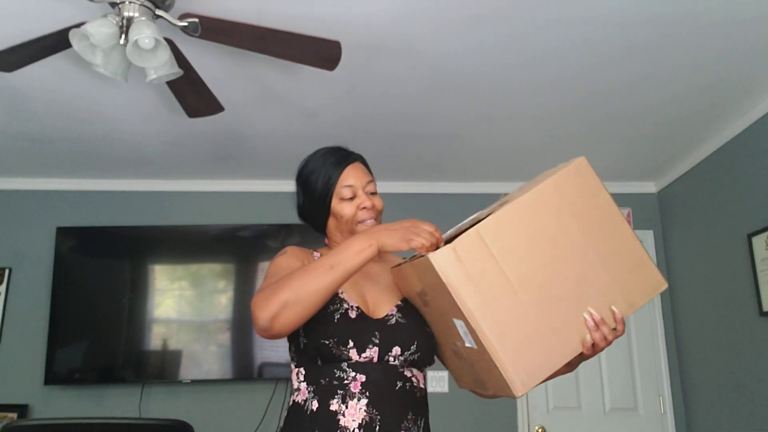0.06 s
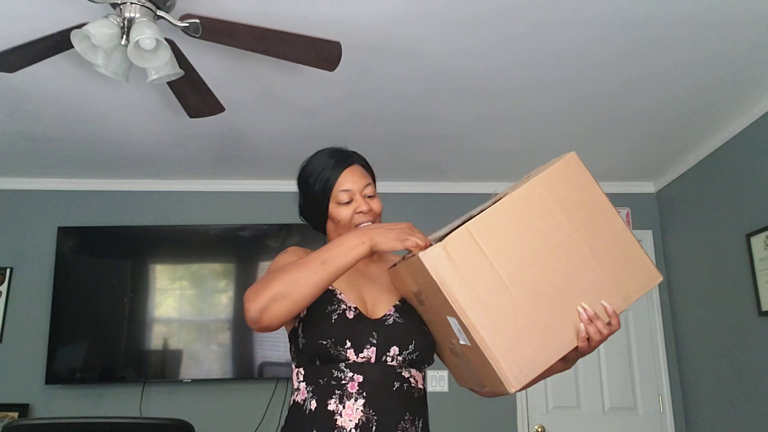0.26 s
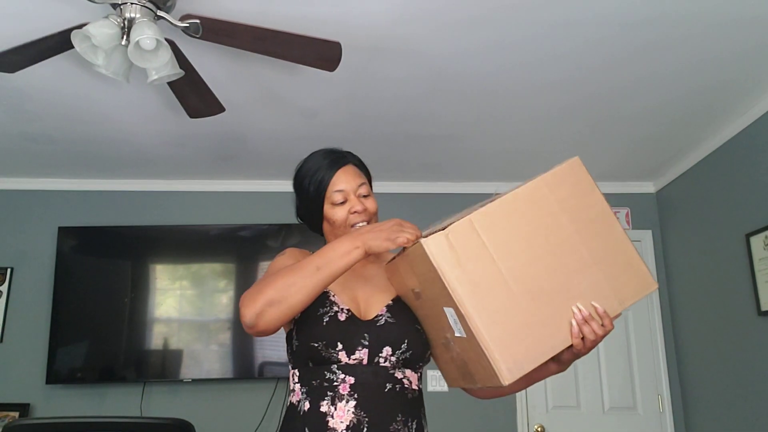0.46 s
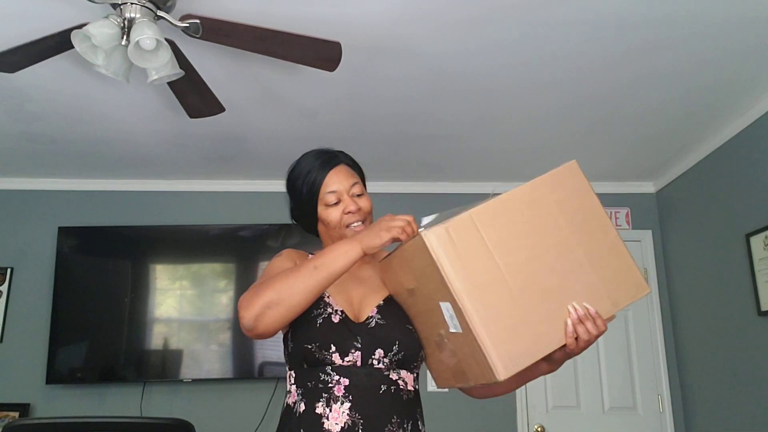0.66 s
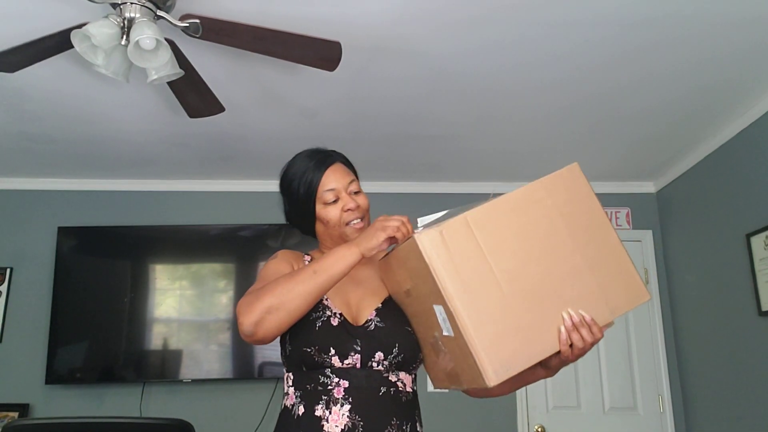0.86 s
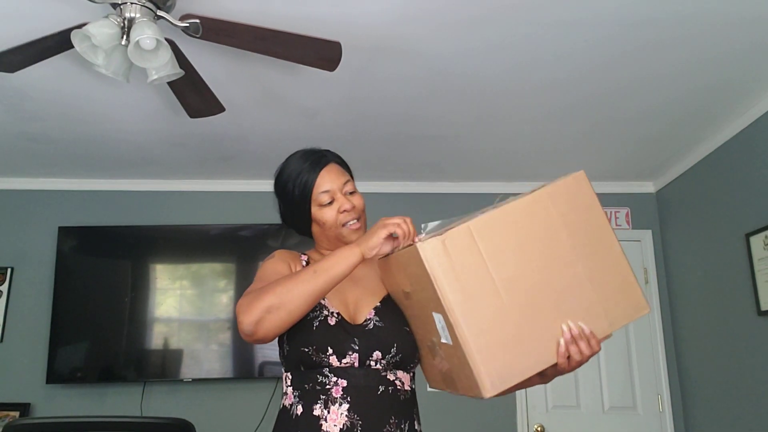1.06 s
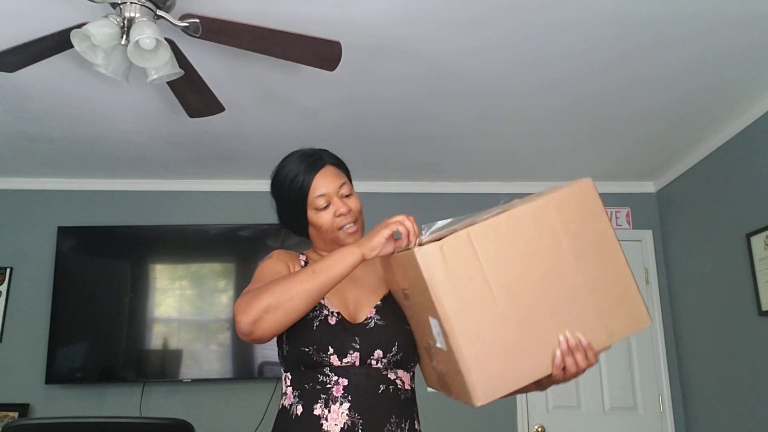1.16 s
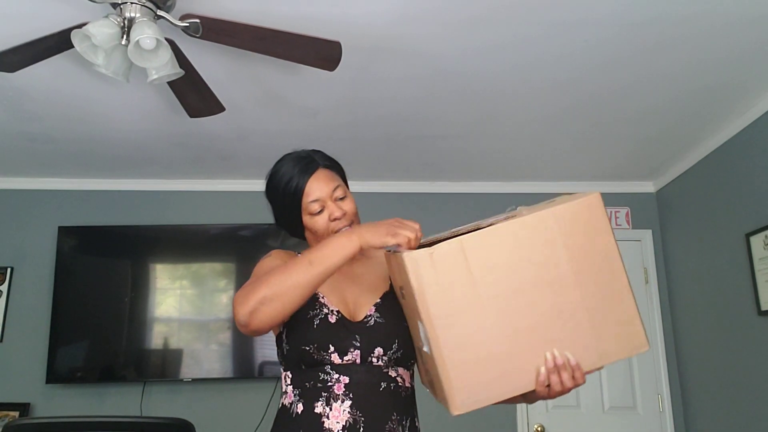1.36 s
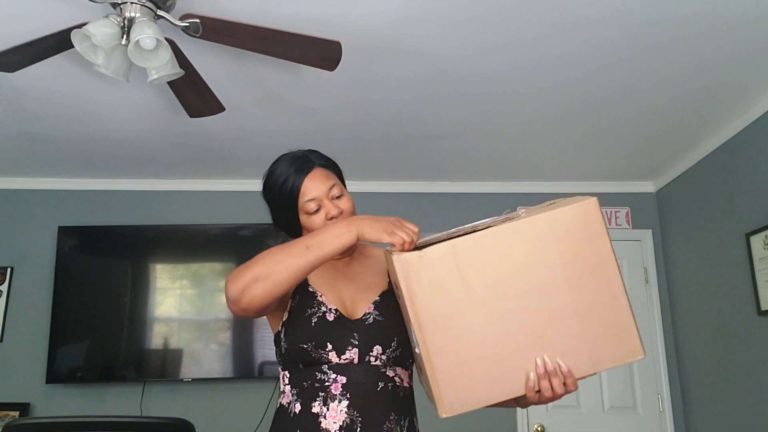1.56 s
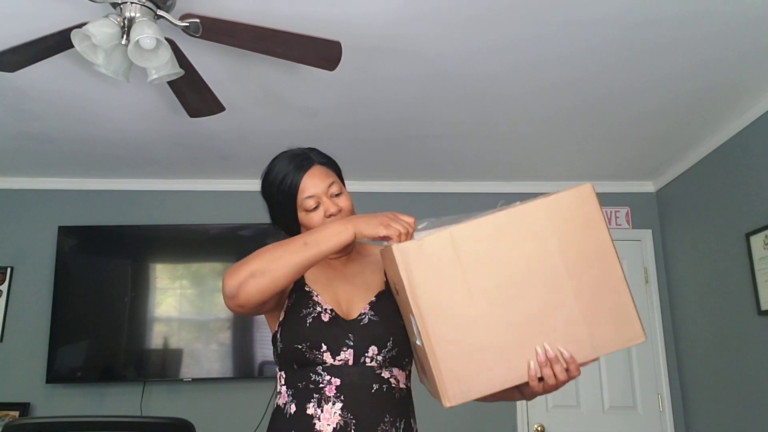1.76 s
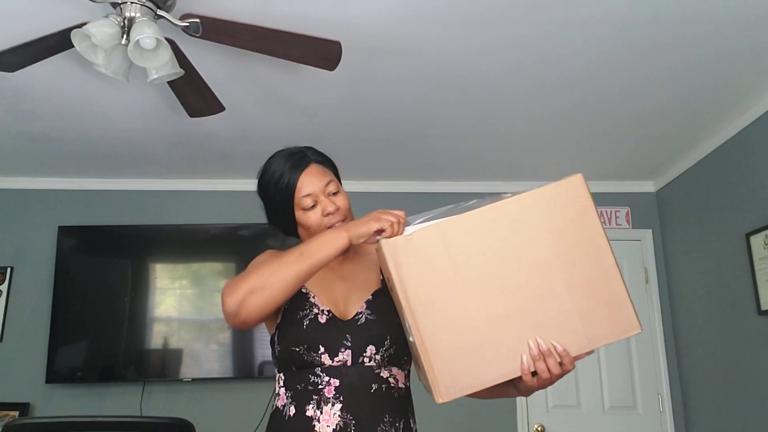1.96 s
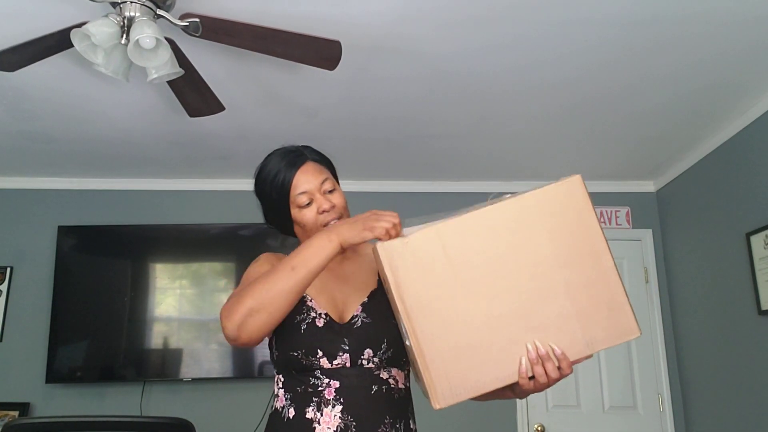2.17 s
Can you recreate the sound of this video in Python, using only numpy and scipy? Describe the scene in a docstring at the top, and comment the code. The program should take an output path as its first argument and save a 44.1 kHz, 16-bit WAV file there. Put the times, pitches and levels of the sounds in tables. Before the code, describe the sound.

Packing tape snaps and crackles under picking fingernails on a large cardboard box in a bare room

```python
"""Packing tape snaps and crackles under fingernails, on a large cardboard box held in the arms.
Each snap is a dying puff of noise, heard straight and off the ceiling; crackle and scrape are random grains.
The box answers with dull knocks and a rubbing rumble, made by ringing its modes.
A bare living room rings on with a wall echo and a noise tail, over a steady hush.
Two microphones listen from the left: the left one hears the sound slightly sooner."""
import sys
import numpy as np
from scipy import signal
from scipy.fft import rfft, irfft, next_fast_len
from scipy.io import wavfile

SR = 44100
rng = np.random.default_rng(int(sys.argv[2]) if len(sys.argv) > 2 else 0)


def boost_factor(decibels):
    """Convert a level in decibels to a linear amplitude factor."""
    exponent = np.asarray(decibels, float) / 20
    return 10 ** exponent


def pcm_store(signal):
    """Save signal as 16-bit PCM."""
    levels = np.round(np.clip(np.atleast_2d(signal), -1, 1) * 32767)
    wavfile.write(sys.argv[1], SR, levels.astype(np.int16).T)


N = 98298  # samples in the scene


def tape():
    """Snaps, with crackles and scrapes that follow the hands; row 0 goes to the microphones, row 1 to the room."""
    # tape snaps before the trims below: [t/s, treble level/dB, card level below the split/dB,
    # card level above it/dB, direct path against the ceiling echo/dB (the box often hides it)]
    snaps = [(.062, -58, -55.5, -73, -7), (0.155, -28, -71, -48, -6), (0.174, -48, -75, -65, 0),
             (0.216, -37, -71, -47.5, -6.5), (0.2744, -32.5, -69, -44.5, -17),
             (0.285, -28.5, -41, -44, -24), (0.4066, -30.5, -55.5, -56, -14), (0.5701, -23, -36, -56, -0.5),
             (0.677, -60, -48, -65, -2.5), (0.9016, -24, -40.5, -32.5, -9), (.941, -46, -61, -42.5, 1),
             (0.958, -45, -52, -56, 3.5), (1.1454, -33.5, -50.5, -60, 6), (1.163, -57, -47.5, -60, 2.5),
             (1.2027, -37.5, -65, -55.5, 8), (1.3316, -48, -86, -94, 3.5), (1.3713, -36, -83, -76, 6),
             (1.403, -52, -51, -47.5, 9.5), (1.4308, -29.5, -51, -40.5, -1.5),
             (1.529, -43.5, -72, -82, 6.5), (1.614, -36, -57, -42.5, 1), (1.674, -42, -74, -57, -2),
             (1.686, -29, -55, -43, 7), (1.740, -23, -37, -36, 3), (1.768, -16, -36, -32, 5),
             (1.767, -24.5, -28, -28.5, -1), (1.9926, -53, -55, -57.5, 1), (2.018, -45, -75, -70, 5),
             (2.063, -46.5, -82, -59.5, 4), (2.1137, -45, -77, -55, 4), (2.152, -40.5, -78, -60, 4),
             (2.1758, -31, -54, -75, 7)]
    # tape through the microphones, shape only: [f/Hz, level per Hz/dB]
    tape_colour = [(3000, -16.5), (5500, -20), (6500, -8), (7730, -8), (8360, -3), (9040, -4), (10600, 0),
                   (13000, 3.5), (15500, 2.5), (17000, -0.5)]
    # card surface, shape only: [f/Hz, level per Hz/dB]
    card_colour = [(800, -13), (1130, 0.5), (1350, -6.5), (1620, -12.5), (1900, -6.5), (2200, -8),
                   (2700, -9.5), (3300, -7), (4000, -14.5), (4660, -11), (5700, -9.5), (6600, -11.5),
                   (7500, -10.5), (9750, -31.5)]
    snap_t60_s, card_t60_s, split_hz = 0.0099, 0.013, 3150
    snap_trim_db, card_trim_db, crackle_trim_db, scrape_trim_db = 2.5, 6, -0.5, -6
    crackles_per_s, scrapes_per_s = 2800, 2000

    s, treble_db, low_db, high_db, direct_db = np.transpose(snaps)
    crackle = boost_factor(crackle_trim_db) * hands(index=1) * grains(crackles_per_s, spread_db=2.5)
    bright = bursts(s, treble_db + snap_trim_db, direct_db, snap_t60_s) + crackle
    dull = boost_factor(scrape_trim_db) * hands(index=3) * grains(scrapes_per_s, spread_db=1.0)
    for db, kind in (low_db, "low"), (high_db, "high"):
        sos = signal.butter(2, split_hz, kind, fs=SR, output="sos")
        puffs = bursts(s, db + card_trim_db, direct_db, card_t60_s)
        dull = dull + signal.sosfilt(sos, puffs)
    return coloured(bright, tape_colour) + coloured(dull, card_colour)


def bursts(s, db, direct_db, t60):
    """Row 0: dying noise puffs, straight and off the ceiling. Row 1: clicks of the same energy for the room."""
    ceiling_s = .005  # delay of the ceiling path
    decay = boost_factor(-60 / (t60 * SR))  # per sample
    clicks = np.zeros((2, N))
    for lag, gain in (0, boost_factor(db + direct_db)), (ceiling_s, boost_factor(db)):
        np.add.at(clicks[0], ((s + lag) * SR).astype(int), gain)
    both_paths = np.sqrt((1 + boost_factor(2 * direct_db)) / (1 - decay * decay))
    np.add.at(clicks[1], (s * SR).astype(int), boost_factor(db) * both_paths)
    envelope = signal.lfilter([1], [1, -decay], clicks[0] + 1e-18)
    return np.array([envelope * rng.choice([-1, 1], N), clicks[1]])


def hands(index):
    """Gain of one friction layer: the slow hand curve plus a raised-cosine swell for each stroke."""
    # fingers on tape and card, before each layer's trim: [t/s, tape crackle/dB, box rubbing/dB, scrape/dB]
    hand_curve = [(0.0, -57, -50.5, -64), (0.15, -58, -52.5, -66.5), (0.3, -55, -64, -56),
                  (0.4, -47, -55, -88), (0.56, -68, -59, -62), (0.69, -49.5, -47.5, -58),
                  (0.8, -64, -53, -71), (0.96, -86, -48.5, -93), (1.06, -72, -62.5, -68),
                  (1.1, -55, -50, -59.5), (1.21, -91, -55, -78), (1.31, -70, -111, -94),
                  (1.43, -48, -46, -49), (1.47, -67, -86, -87), (1.59, -49, -75, -87),
                  (1.72, -45.5, -67, -45.5), (1.83, -59, -54, -83), (1.9, -73, -67, -76),
                  (2.09, -55.5, -64.5, -72), (2.23, -46, -55.5, -91)]
    # nails and fingers dragging along, a swell of dense grains, before each layer's trim:
    # [middle t/s, length/s, tape level/dB, box level/dB, card level/dB]
    strokes = [(0.093, 0.024, -49.5, -58, -73), (0.263, 0.076, -49, -45, -56.5),
               (0.434, 0.056, -73, -50.5, -58), (0.645, 0.035, -74, -60, -55), (0.86, 0.044, -89, -70, -90),
               (1.022, 0.035, -36.5, -74, -50.5), (1.151, 0.094, -49.5, -54, -54),
               (1.382, 0.066, -59, -53, -53.5), (1.404, 0.017, -57, -64, -70),
               (1.728, 0.026, -37, -43, -50), (1.998, 0.034, -54, -65, -66),
               (2.104, 0.055, -52.5, -69, -81), (2.174, 0.0073, -44, -70, -59)]
    t = np.arange(N) / SR
    curve = np.array(hand_curve)
    gain = boost_factor(np.interp(t, curve[:, 0], curve[:, index]))
    for row in strokes:
        swell = np.cos(np.pi * np.clip((t - row[0]) / row[1], -.5, .5)) ** 2
        gain = gain + boost_factor(row[index + 1]) * swell
    return gain


def grains(rate, spread_db):
    """Random clicks of uneven size and either sign, at a mean rate per second; rms 1."""
    sizes = boost_factor(spread_db * np.minimum(rng.exponential(1, N), 4)) * rng.choice([-1, 1], N)
    return rms_one(sizes * (rng.random(N) < rate / SR))


def box():
    """Knocks (two quick touches) strike each mode with a strength of its own; rubbing shakes the same modes."""
    # knocks on the box, before the trim: [t/s, level/dB, brightness of upper modes/dB, depth of lowest modes/dB]
    knock_list = [(0.09, -40, -41, -19), (0.23, -39, -9, -10), (0.263, -46, -5, -5), (0.289, -47, 2.5, -28),
                  (0.573, -45, 11.5, -37), (0.665, -44.5, -9, -30), (0.789, -45, -2, -19),
                  (0.858, -41, -31, -33), (0.904, -31, -1.5, -5), (0.94, -36.5, -11, -35),
                  (1.013, -36.5, -13, 7.5), (1.101, -40.5, -20, -28), (1.14, -36, -2.5, -33.5),
                  (1.332, -41, -12, -14), (1.37, -37, -2, -8), (1.4, -29, -8, -19), (1.434, -39, -3.5, -27),
                  (1.617, -69.5, 33.5, -14), (1.69, -48.5, 11, -29), (1.737, -37.5, 10, -28),
                  (1.767, -25.5, 4.5, -7), (1.789, -35.5, -46, 4), (1.963, -54.5, 4.5, -17),
                  (2.08, -45, -31, -7.5)]
    # modes of the box: [f/Hz, relative level/dB, t60/s]
    modes = [(81.7, -2, 0.24), (116, -34, 0.084), (203.2, -2.5, 0.068), (221.2, -3.5, 0.094),
             (266, 4.5, 0.075), (338.7, 1.5, 0.045), (381.7, -2, 0.083), (454.4, -4.5, 0.055),
             (552, 1.5, 0.027), (701, -0.5, 0.039), (828, 2.5, 0.041), (1040.5, -4, 0.029),
             (1105, -4, 0.02), (2059, -7.5, 0.017)]
    knock_trim_db, second_touch_s, second_touch_db = -8, .006, -4.5
    dull_hz, bright_hz = 450, 1100  # brightness comes in between these
    deep_under_hz, thud_lag_s = 140, 0.01167  # a deep thud follows each knock about 12 ms later
    rubs_per_s, rub_db, deep_rub_db, rub_db_per_octave = 400, -5.5, -12, -1.9

    s, db, bright_db, deep_db = np.transpose(knock_list)
    chance = rng.standard_normal((len(s), len(modes), 2))
    knocks, rubs, rubbing = 0, 0, hands(index=2)
    for k, (hz, mode_db, t60) in enumerate(modes):
        deep = hz < deep_under_hz
        brightness = np.clip(np.log(hz / dull_hz) / np.log(bright_hz / dull_hz), 0, 1)
        level = db + knock_trim_db + mode_db + bright_db * brightness + deep_db * deep
        clicks = np.zeros(N + SR)
        touch_or_thud = ((s + thud_lag_s * deep) * SR).astype(int)
        second_touch = ((s + second_touch_s) * SR).astype(int)
        clicks[touch_or_thud] = boost_factor(level + 2.0 * chance[:, k, 0])
        clicks[second_touch] = boost_factor(level + second_touch_db) * chance[:, k, 1]
        knocks = knocks + (-1) ** k * ring(clicks[:N], hz, t60)  # neighbouring modes in opposite sign
        rub_gain = boost_factor(mode_db + deep_rub_db * deep + rub_db_per_octave * np.log2(hz / 270))
        rubs = rubs + rub_gain * ring(rubbing * grains(rubs_per_s, spread_db=0.0), hz, t60)
    rub_scale = np.sqrt(np.mean(rubbing ** 2) / np.mean(rubs ** 2))
    return knocks + boost_factor(rub_db) * rubs * rub_scale


def ring(x, hz, t60):
    """Two-pole resonator: a unit click sets a dying sine of height 1 ringing."""
    r, w = boost_factor(-60 / (t60 * SR)), 2 * np.pi * hz / SR
    return signal.lfilter([0, np.sin(w)], [1, -2 * r * np.cos(w), r * r], x + 1e-18)


def room(x):
    """A smeared wall echo and a noise tail that dies band by band; several random tails, crossfaded over time."""
    # room tail: [f/Hz, t60/s, level against the direct sound/dB, left-right likeness 0..1]
    tail_bands = [(55.6, 0.15, -19.5, 0.51), (118, 0.68, -13.5, 0.83), (248, 0.34, -3.5, 0.86),
                  (463, 0.25, 4.5, 0.78), (926, 0.24, 2, 0), (1970, 0.29, 7, 0.078),
                  (3960, 0.26, 8.5, 0.35), (7400, .3, 0, 0), (12830, 0.2, -3.5, 0.0)]
    tails = 14  # random room tails, evenly spaced over the scene
    wall_s, echo_t60_s = .0093, 0.01
    wall_db = np.array([[-3], [-19.5]])  # left, right
    t = np.arange(SR // 2) / SR
    h = np.zeros((tails, 2, len(t)))
    for hz, t60, db, alike in tail_bands:
        low = hz / np.sqrt(2) if hz > 70 else 30
        high = min(hz * np.sqrt(2), .45 * SR)
        sos = signal.butter(2, [low, high], "band", fs=SR, output="sos")
        mid, side = signal.sosfilt(sos, rng.standard_normal((2, tails, 1, len(t))))
        alike = np.clip(alike, 0, 1)
        fade = boost_factor(-60 * t / t60) * np.clip(t / wall_s, 0, 1)
        stereo = np.sqrt(1 + alike) * mid + np.sqrt(1 - alike) * side * [[1], [-1]]
        h += boost_factor(db) * fade / np.sqrt(2 * np.sum(fade ** 2)) * stereo
    fade = boost_factor(-60 * np.maximum(t - wall_s, 0) / echo_t60_s) * (t >= wall_s)
    h += boost_factor(wall_db) * fade / np.sqrt(np.sum(fade ** 2)) * rng.standard_normal((tails, 2, len(t)))

    tail_place = np.arange(N) / N * (tails - 1)
    wet = 0
    for k in range(tails):
        share = np.clip(1 - abs(tail_place - k), 0, 1)  # crossfade from tail to tail
        wet = wet + signal.fftconvolve((x * share)[None], h[k], axes=1)[:, :N]
    return wet


def hush():
    """Steady coloured room noise, alike at both microphones in the bass only."""
    # room hush, shape only: [f/Hz, level per Hz/dB]
    hush_colour = [(15, -46), (25, 0.5), (123, -1.5), (241, -2.5), (1390, -20.5), (1550, -7.5),
                   (3680, -57.5), (4210, -44), (5670, -25.5), (7030, -29.5), (15800, -8)]
    mid, side = coloured(rng.standard_normal((2, N)), hush_colour)
    side = signal.sosfilt(signal.butter(1, 600, "high", fs=SR, output="sos"), side)
    return boost_factor(-58) * rms_one(mid + side * np.array([[1], [-1]]))


def at_hz(points, hz):
    """Read a spectrum table along log frequency."""
    p = np.array(points, float)
    return np.interp(np.log(hz + 1), np.log(p[:, 0] + 1), p[:, 1])


def coloured(x, spectrum):
    """Causal (minimum-phase) filter of unit energy that follows a spectrum table."""
    size = 8192
    cepstrum = irfft(np.log(boost_factor(at_hz(spectrum, np.fft.rfftfreq(size, 1 / SR)))))
    cepstrum[1:size // 2] *= 2  # folding the cepstrum forward gives minimum phase
    cepstrum[size // 2 + 1:] = 0
    h = irfft(np.exp(rfft(cepstrum)))[:size // 2]
    h = h / np.sqrt(np.sum(h ** 2))
    return signal.fftconvolve(x, h.reshape((1,) * (x.ndim - 1) + (-1,)), axes=-1)[..., :N]


def rms_one(x):
    """Scale to unit rms."""
    return x / np.sqrt(np.mean(x ** 2) + 1e-20)


def scene():
    """Tape and box, near and through the room, over the hush."""
    near, around = tape() + box()
    return near + room(around) + hush()


def roll_off(x):
    """The treble ends steeply here."""
    return signal.sosfilt(signal.butter(12, 16960, fs=SR, output="sos"), x)


def record(dry):
    """The right microphone hears more top treble, a little later; all is cut off sharply just under 16 kHz."""
    # balance of the pair: [f/Hz, left minus right/dB]
    left_minus_right = [(60, -2), (380, 0.5), (1290, 0.2), (2380, 7.5), (4400, -3), (6500, 2.5),
                        (8500, -6.5), (11000, -13.5), (13500, -8.5), (16000, -4)]
    # a dip in both capsules: [f/Hz, level/dB]
    capsule = [(1250, 0.0), (1600, -2), (1950, -1)]
    left_lag_s, cutoff_hz = -.00005, 15850  # negative lag: the left is early
    size = next_fast_len(N + 4096)
    hz = np.fft.rfftfreq(size, 1 / SR)
    tilt = boost_factor(at_hz(left_minus_right, hz) / 2)
    left = tilt * np.exp(-2j * np.pi * hz * left_lag_s)
    microphones = np.array([left, 1 / tilt]) * boost_factor(at_hz(capsule, hz))
    sharp_cut = boost_factor(-40 * np.clip((hz - cutoff_hz) / 150, 0, 1))
    mix = irfft(rfft(dry, size) * microphones * sharp_cut, size)[:, :N]
    return roll_off(mix)


dry = scene()
out = record(dry)
pcm_store(out)
```